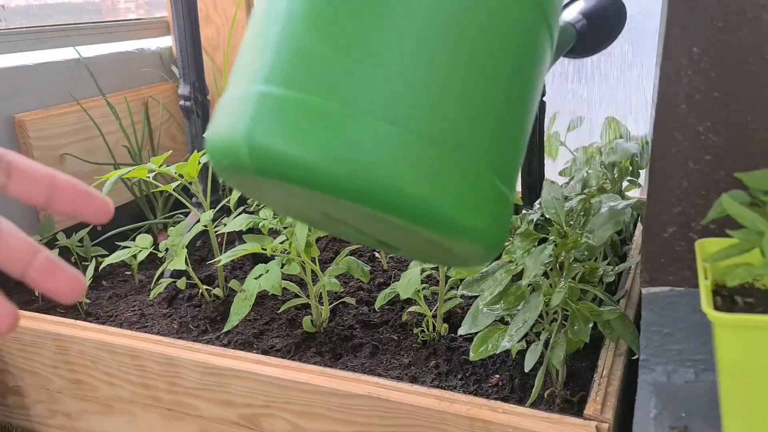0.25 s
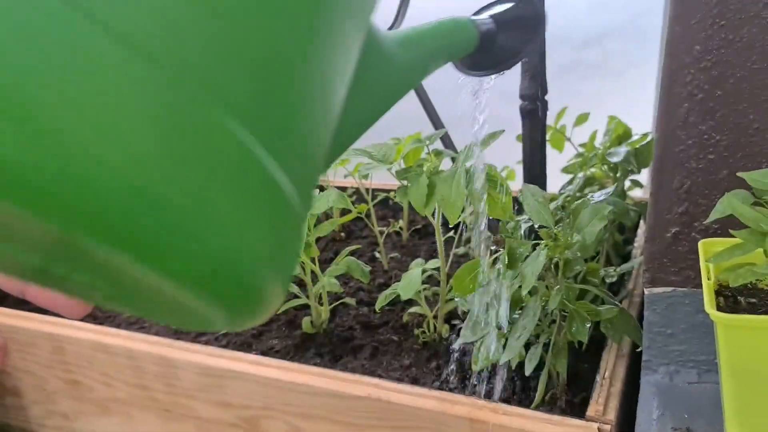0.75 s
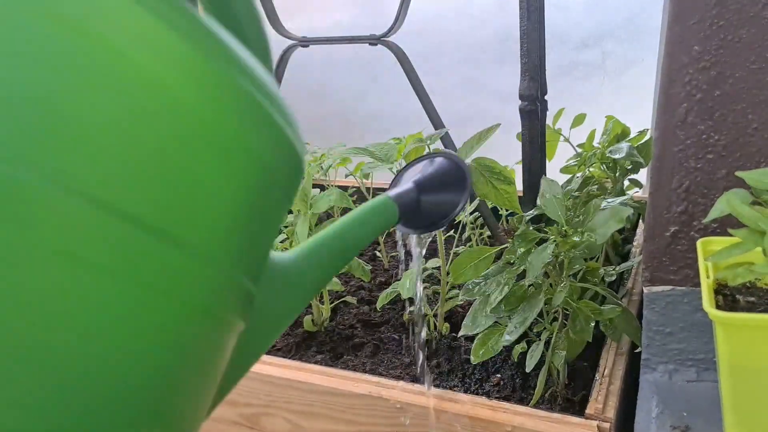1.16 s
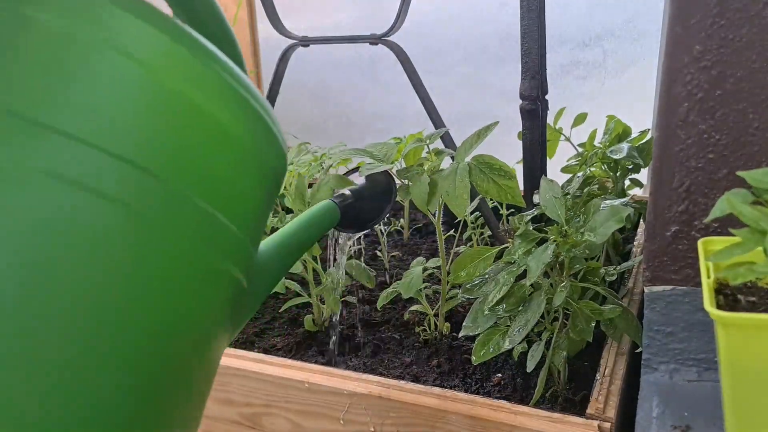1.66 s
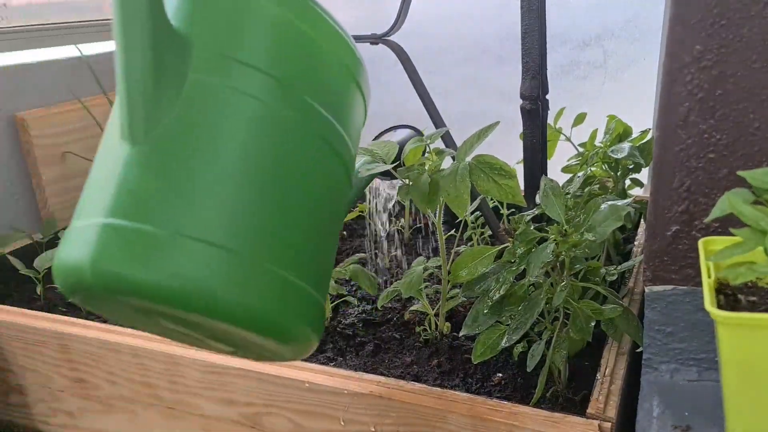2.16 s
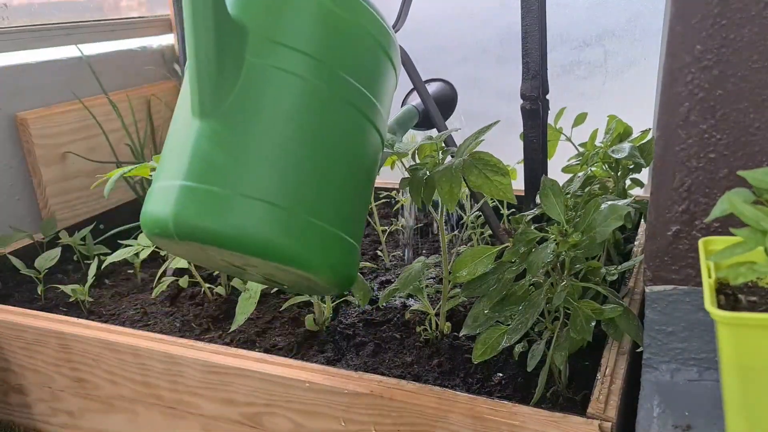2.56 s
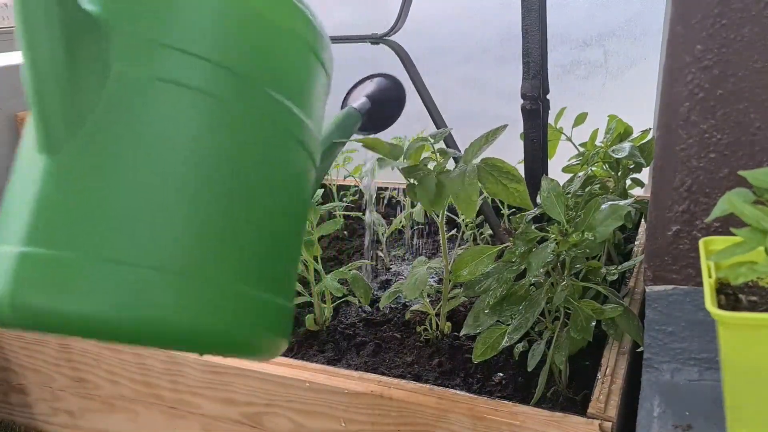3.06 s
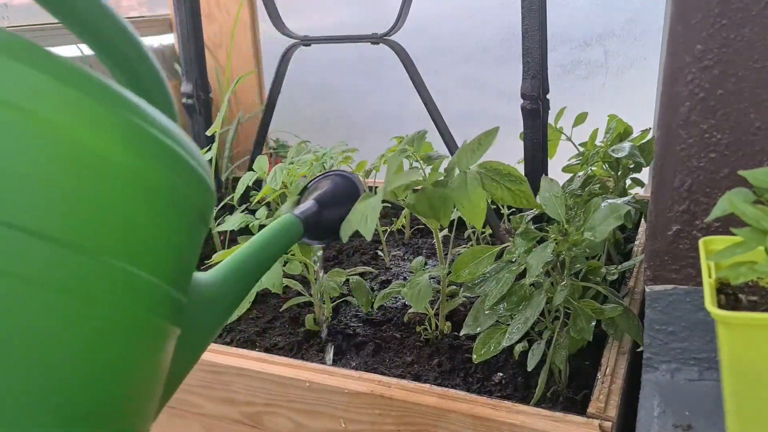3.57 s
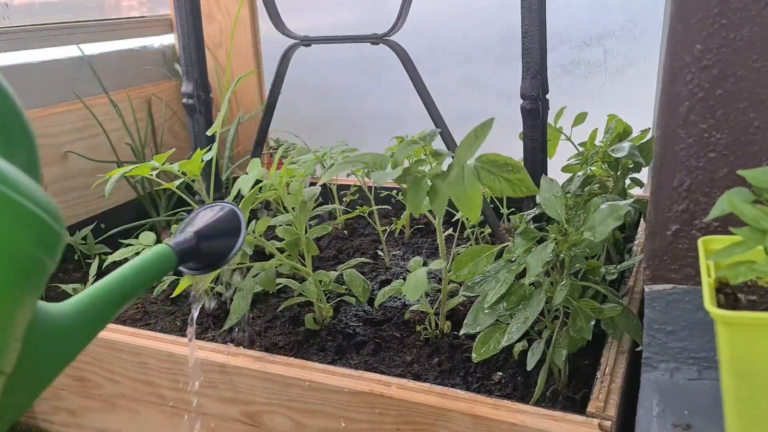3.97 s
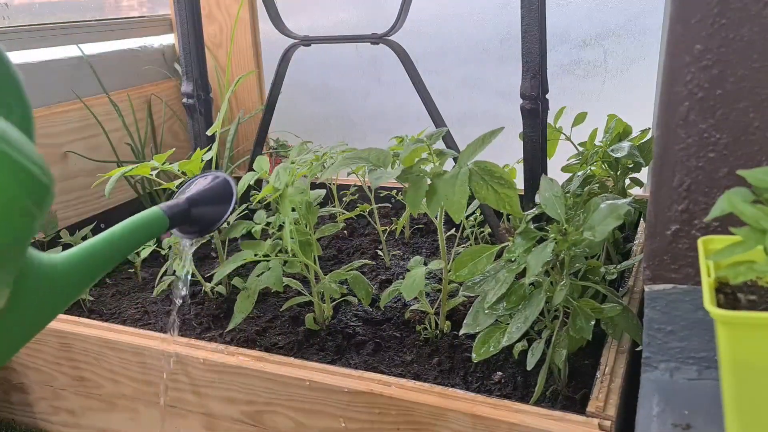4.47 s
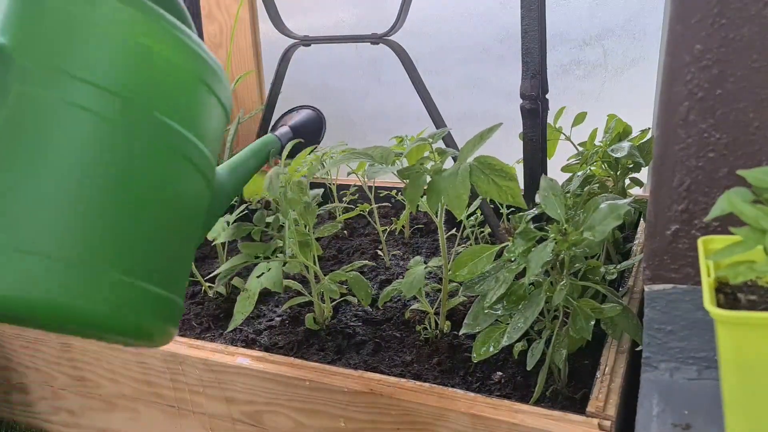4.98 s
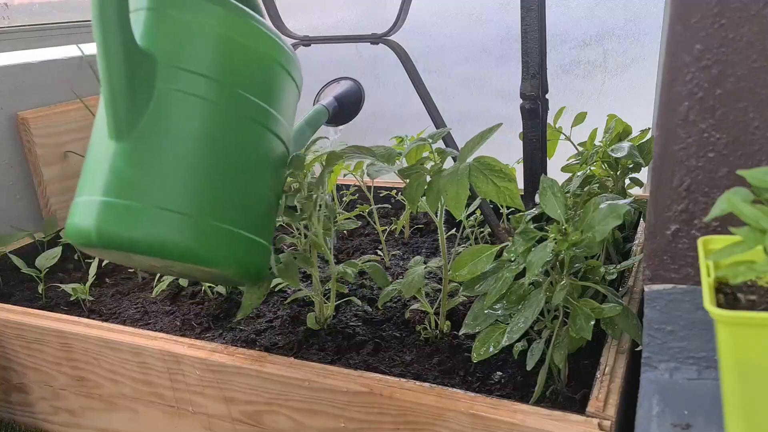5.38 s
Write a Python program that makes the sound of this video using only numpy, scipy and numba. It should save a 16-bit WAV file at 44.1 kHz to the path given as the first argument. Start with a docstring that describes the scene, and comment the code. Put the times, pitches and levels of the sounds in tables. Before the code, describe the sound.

A balcony planter is watered for about five and a half seconds, heard by two spaced microphones. A broad, bass-heavy city rumble swells gently throughout, with faint hiss and thin, dry ticks of uneven loudness about sixteen times a second. Water is a light, high, crisp patter on leaves with duller splatter on soil, not a heavy stream. Scattered drops begin around 0.4, cluster near 0.85-1.2, then thin out, with a clear plop at 1.8. From 2.7 to 3.2 drops and small bubbly plops thicken. A low engine drone swells from 2.4 to 3.6, strongest near 3. At 3.03 the plastic can bumps the planter in a short hollow clatter of about a tenth of a second. Two light taps come at 3.6, a faint soft swish at 3.8. After a lull, the sharpest, busiest spatter and plops come at 4.2-4.65, followed by sparse drops, with the spray rising slightly at the end.

```python
"""Water dribbles from a plastic watering can onto leaves and soil in a wooden planter on a balcony.
The drops are short puffs of filtered noise over a fine spray, and plops add a bubble tone.
The can bumps the planter once (short pushes ring it), then come two light taps and a soft broad swish.
An engine drone, a wavering sine, passes in the city rumble, which is shaped noise.
A thin dry tick of single samples recurs about sixteen times a second. Two spaced microphones."""
import sys
import numpy as np
from scipy import signal
from scipy.fft import rfft, irfft, next_fast_len
from scipy.io import wavfile
from scipy.ndimage import uniform_filter1d
from numba import njit

SR = 44100
rng = np.random.default_rng(int(sys.argv[2]) if len(sys.argv) > 2 else 0)


def file_out(sig):
    """Save sig as 16-bit WAV at sys.argv[1]."""
    # one column per channel
    cols = np.atleast_2d(sig).T
    # limit, then scale
    lim = np.clip(cols, -1, 1)
    pcm = np.round(lim * 32767).astype(np.int16)
    wavfile.write(sys.argv[1], SR, pcm)


N = 248283
TIME = np.arange(N) / SR  # seconds

# city noise by pitch; only the shape counts: (frequency [Hz], relative level per Hz [dB])
CITY_SPECTRUM = [(15, -74), (25, -30), (38, -4.5), (54, 1), (94, 0.5), (125, -10), (192, -8), (237, -16),
                 (276, -16.5), (572, -22), (999, -22), (1210, -26.5), (1900, -26), (2460, -46), (4200, -66),
                 (5460, -103), (9240, -120)]
# broad and narrow humps and dips in the city noise: (frequency [Hz], width [Hz], gain [dB])
CITY_HUMPS = [(59, 20, 1.5), (87, 8.5, 1), (192.8, 17, 5.5), (285, 14.7, 2.5), (330.6, 9.3, 4),
              (436, 78, 1.5), (863, 19, 4), (1830, 220, -3), (2990, 550, 8)]
# rise and fall of the traffic, each about its own mean: (time [s], rumble [dB], boom [dB], tyre roar [dB])
TRAFFIC_SWELL = [(0.0, -37, -32.5, -43.5), (0.25, -34, -39, -43), (0.61, -32.5, -42, -44.5),
                 (1.0, -39.5, -33, -42.5), (1.32, -33.5, -40, -44), (1.86, -36, -40, -43),
                 (2.12, -37.5, -45.5, -43.5), (2.6, -36, -41, -44), (3.26, -35.5, -43.5, -44.5),
                 (4.17, -34.5, -42, -44), (4.55, -38, -40.5, -43.5), (5.36, -33.5, -44, -44),
                 (5.63, -34.5, -41, -45.5)]
# balance of the city between the microphones: (frequency [Hz], left minus right [dB])
CITY_TILT = [(60, 0), (110, -0.5), (200, -1.5), (380, -4), (700, -2.5), (1290, -1.5), (2380, 1.5),
             (4400, -2), (8120, -1.5), (15000, -1.5)]
# how far the city differs at the two microphones: (frequency [Hz], side minus mid [dB])
CITY_WIDTH = [(60, -35), (110, -22), (200, -25), (380, -7), (700, -1), (1290, 1.5), (2380, 1), (4400, -0.5),
              (8120, 0), (15000, 0)]
# spray as the can swings to and fro:
# (time [s], relative level on the leaves [dB], relative level of the duller splatter on wet soil [dB])
POUR_LEVELS = [(0.0, -63, -66), (0.17, -67.5, -67), (0.47, -59, -73), (0.78, -67, -66), (0.89, -65, -72),
               (1.03, -53, -55.5), (1.18, -58, -69), (1.3, -74, -66), (1.39, -68, -73), (1.61, -68, -69),
               (1.77, -71, -69), (1.93, -61, -68), (2.18, -71, -70), (2.34, -61, -66), (2.43, -64, -64),
               (2.62, -51, -67.5), (2.74, -55, -65), (2.92, -49, -55.5), (2.96, -51, -59),
               (3.06, -45, -50.5), (3.18, -54, -61), (3.32, -64.5, -67), (3.43, -55, -57),
               (3.61, -79, -70.5), (3.86, -88, -78), (4.01, -54, -67.5), (4.22, -49, -70), (4.33, -65, -63),
               (4.42, -55, -63), (4.47, -47, -59), (4.52, -42, -54), (4.63, -67, -60.5), (4.69, -72, -69),
               (4.81, -72, -79), (5.05, -63, -68), (5.24, -59, -67.5), (5.63, -47, -70)]
# ticks with a set level, mostly loud, a few faint: (number of the tick [count from 0], level [dB])
SET_TICKS = [(0, -23), (1, -23), (2, -25), (5, -30), (6, -30), (9, -23), (10, -25), (13, -23), (15, -22),
             (16, -23), (17, -27), (18, -27), (20, -38), (21, -28), (23, -21), (24, -29), (25, -28),
             (26, -27), (27, -31), (28, -31), (29, -27), (30, -21), (31, -28), (34, -29), (33, -23),
             (35, -25), (38, -28), (40, -26), (42, -26), (46, -27), (47, -21), (49, -24), (50, -17),
             (51, -17), (54, -24), (56, -36), (60, -35), (62, -44), (58, -28), (59, -25), (61, -26),
             (65, -23), (74, -31), (76, -40), (75, -29), (79, -25), (80, -24), (81, -26), (82, -20),
             (85, -27), (87, -23)]
# the loudest single drops: (time [s], relative level [dB], centre [Hz], length [ms], left minus right [dB])
LOUD_DROPS = [(0.352, -54, 12300, 14, 0), (0.371, -46, 9900, 19, -3), (0.386, -48.5, 8450, 39, -2),
              (0.447, -51, 11500, 5, 0), (0.4807, -40, 13000, 2.3, 0), (0.5155, -51, 6600, 2.3, -2),
              (0.5794, -44, 11500, 1.3, -2), (0.6712, -51, 12300, 2.0, -1), (0.694, -45, 11800, 3, -9),
              (0.885, -61, 14000, 5, -2), (0.7001, -46, 11400, 1.2, -2), (0.838, -44, 12800, 2.8, -1),
              (0.852, -40, 11500, 2.2, -5), (0.857, -32.5, 11800, 1.5, -1), (0.91, -59, 11000, 2, -2),
              (0.943, -36, 12600, 2.8, 4), (0.955, -43, 11900, 6.3, -5), (0.972, -46, 11600, 6, 1),
              (0.9915, -26, 12100, 1.1, -2), (1.024, -36.5, 11300, 2.8, 0), (1.05, -36, 11600, 2.4, 1),
              (1.076, -44, 10600, 3.1, -1), (1.1367, -45, 11400, 3.5, -4), (1.1495, -43, 12500, 1.5, -2),
              (1.177, -46, 11400, 9.4, -1), (1.2046, -44, 11500, 1.5, -3), (1.298, -44, 11300, 3.3, -2),
              (1.3125, -37, 11200, 2.7, -3), (1.3347, -39.5, 11700, 2.6, -4), (1.3579, -50, 10200, 1.7, -2),
              (1.6, -49, 10600, 4.0, -2), (1.6175, -51, 10500, 4.3, -3), (1.688, -45, 10300, 4.8, -2),
              (1.83, -40.5, 8200, 1.5, -1), (1.906, -37.5, 6500, 0.74, 1), (2.042, -61, 14000, 4, -6),
              (2.16, -55, 10000, 11, -6), (2.207, -55, 10000, 6, -2), (2.272, -51, 9600, 8.6, -3),
              (2.282, -45, 11500, 3, -1), (2.3308, -49, 10800, 7, -1), (2.368, -48, 10500, 4, -5),
              (2.4314, -47, 10000, 1.1, -6), (2.4933, -44, 10200, 4.1, -1), (2.522, -54, 11300, 1.6, -3),
              (2.6182, -48, 9500, 2, -8), (2.6746, -43, 11200, 1.5, 0), (2.7376, -35, 11770, 2.7, -2),
              (2.76, -42, 10000, 4, -1), (2.7863, -41, 6600, 6.3, -1), (2.807, -37, 9500, 4, -2),
              (2.8204, -33.5, 11300, 4.2, -1), (2.864, -33.5, 10900, 1.8, -3), (2.87, -46, 12500, 1.5, -2),
              (2.878, -37, 11000, 2, -2), (2.892, -51, 13500, 2, -2), (2.904, -47, 11800, 1.8, -2),
              (2.912, -49, 11800, 3, 2), (2.9821, -52, 12500, 4.0, 1), (2.998, -46, 11000, 2, -2),
              (3.012, -39.5, 10600, 2.8, -7), (3.094, -54, 9300, 15, 1), (3.1475, -49, 9050, 6.5, 0),
              (3.1756, -37.5, 9940, 4.7, 0), (3.2358, -44, 10200, 7.1, -5), (3.352, -38, 8800, 3.1, -1),
              (3.3747, -40, 10400, 1.6, -5), (3.4197, -42, 9900, 4.3, -2), (3.4522, -46, 10800, 9.3, 0),
              (3.4792, -44, 9900, 12, -4), (3.5, -32, 10930, 8.7, -1), (3.636, -57, 7000, 6.5, -1),
              (4.0418, -50, 12200, 4.2, 0), (4.0898, -42.5, 11200, 3.2, 1), (4.101, -43, 11800, 2, -3),
              (4.115, -43, 11500, 2.8, 2), (4.181, -46.5, 12800, 1.5, -3), (4.1929, -39, 11800, 1.4, 0),
              (4.217, -35.5, 9700, 2.8, 0), (4.249, -38, 10800, 6.4, 0), (4.2763, -65, 10500, 2.9, -4),
              (4.309, -32.5, 11100, 2.6, 0), (4.329, -37.5, 10900, 3.7, -3), (4.354, -41, 11000, 1.3, 0),
              (4.357, -28, 10500, 1.8, 1), (4.3854, -34, 11900, 3.4, -2), (4.3956, -41, 12200, 3.0, 0),
              (4.413, -25, 8850, 2.3, -1), (4.4233, -36, 8900, 2.0, 0), (4.442, -36, 9500, 1.9, -2),
              (4.457, -37, 8000, 1.5, 0), (4.474, -37, 9500, 2.5, 2), (4.504, -21.5, 9400, 1.4, -2),
              (4.5195, -36, 10500, 1.2, 1), (4.52, -31, 10300, 1.6, -3), (4.537, -54, 10500, 2, 0),
              (4.556, -38, 10000, 3.4, -2), (4.562, -36, 10100, 4.3, -2), (4.577, -36, 9500, 2.4, 0),
              (4.587, -45, 9600, 2.0, -2), (4.596, -39, 9300, 7.5, 0), (4.633, -48, 11200, 3.2, -6),
              (4.6457, -38, 9000, 4.5, -1), (5.045, -46.0, 11000, 2.6, 0), (5.229, -43.5, 10700, 3.8, -4),
              (5.26, -43, 8640, 8, -1), (5.33, -44, 7700, 3.3, -1), (5.385, -45.5, 10500, 3.1, -3),
              (5.4686, -44, 9800, 5.4, -1), (5.518, -45, 10200, 3, -3), (5.573, -44.5, 10700, 6.5, -1)]
# plops into pooled water: (time [s], relative level [dB], pitch [Hz], time to fall 60 dB [ms])
WATER_PLOPS = [(0.383, -47, 4500, 93), (0.4194, -50.5, 3470, 100), (0.514, -52, 3860, 57),
               (0.762, -52, 4800, 44), (1.025, -46.5, 4480, 30), (1.051, -47, 4500, 25),
               (1.07, -51, 5500, 25), (1.077, -52, 6000, 25), (1.175, -43, 5600, 37),
               (1.191, -44, 3940, 28), (1.203, -45.5, 5800, 25), (1.214, -46, 5300, 30),
               (1.312, -46, 5500, 20), (1.358, -48, 6200, 18), (1.7814, -53, 4800, 50),
               (1.835, -37, 5260, 89), (2.12, -49, 5500, 50), (2.2707, -49.5, 3370, 78),
               (2.281, -52, 4640, 80), (2.33, -51, 4700, 110), (2.341, -52, 8840, 40),
               (2.4059, -51, 6040, 40), (2.433, -52, 4550, 62), (2.741, -44.5, 4050, 76),
               (2.764, -44, 4370, 65), (2.785, -37.5, 4450, 78), (2.8186, -41, 4440, 70),
               (2.831, -41, 4080, 150), (2.85, -40, 2770, 50), (2.858, -36, 4070, 68),
               (2.877, -58, 4300, 40), (2.9038, -45, 5900, 54), (2.915, -44, 2900, 95),
               (2.9453, -43, 6200, 30), (2.978, -48, 2720, 67), (3.093, -44, 6000, 46),
               (3.371, -50, 3060, 64), (3.4184, -52, 3800, 50), (3.474, -40.5, 4280, 91),
               (3.524, -48, 4200, 50), (4.2143, -38, 5900, 30), (4.3075, -48, 2500, 25),
               (4.3559, -33.5, 2670, 40), (4.356, -34, 6000, 25), (4.394, -42, 6300, 25),
               (4.4096, -36, 6000, 22), (4.421, -35, 2220, 25), (4.4412, -34.5, 2300, 25),
               (4.4723, -41, 5700, 25), (4.503, -33.5, 2340, 35), (4.5035, -43, 6600, 25),
               (4.519, -34, 6100, 32), (4.5848, -41.5, 2680, 27), (4.586, -47, 5500, 17),
               (4.6447, -49, 4030, 18), (5.261, -48, 5230, 46), (5.47, -46, 4800, 43),
               (5.591, -48, 6000, 75)]
# engine drone passing below: (time [s], pitch [Hz], level before fades and wavering [dB])
ENGINE_DRONE = [(2.42, 89.3, -40), (2.6, 86, -25.5), (2.85, 79, -26.5), (2.97, 80.3, -19.5),
                (3.08, 82.2, -26), (3.19, 80.7, -20.5), (3.32, 83, -27), (3.46, 86.4, -33),
                (3.6, 86.5, -31)]
# the can bumps and chatters on the planter:
# (time [s], push [dB], contact time [ms], relative noise level [dB])
CAN_BUMPS = [(3.0325, -21, 0.2, -30.5), (3.0347, -15, 0.68, -38), (3.038, -18, 0.59, -36),
             (3.0491, -11, 1.5, -32.5), (3.0553, -18.5, 0.39, -49), (3.0605, -13.5, 1.15, -38),
             (3.07, -17.5, 1.16, -52), (3.076, -21, 1.7, -59), (3.085, -18, 1.4, -57),
             (3.1, -28, 0.95, -61), (3.1078, -20.5, 1.94, -61), (3.114, -30, 2, -58)]
# ringing of the hollow can and planter boards:
# (frequency [Hz], level [dB], time to fall 60 dB [s], left minus right [dB], left phase lead [rad])
BODY_MODES = [(168, -18, 0.041, -6, 4), (268, -2.5, 0.1, -3.5, 0.4), (347, -4.5, 0.043, -8, 1.6),
              (407, -1, 0.062, -8.5, -2), (500, 4, 0.021, -3.5, 2), (718, -9, 0.086, 0, 4),
              (880, -9, 0.044, -7, -2), (1020, -22, 0.038, -1, 1), (1190, -3.5, 0.03, 1.5, 0.4),
              (1660, -16, 0.025, 3, -3), (2140, -4.5, 0.03, 10, 4.5), (2560, -5, 0.027, 15, 3.5),
              (3270, -6, 0.04, -1, 5)]
# something light taps twice nearby: (time [s], relative level [dB])
LIGHT_TAPS = [(3.582, -30), (3.597, -41)]
# ringing of the tapped thing:
# (frequency [Hz], level [dB], time to fall 60 dB [s], left minus right [dB], left phase lead [rad])
TAP_MODES = [(820, 3, .12, 1.1, 2.5), (1633, -2, 0.057, 3, 1.2), (1772, -2, 0.089, 3, 1.9),
             (2080, -2, 0.057, 3, 3.1), (2330, -5, 0.036, 2.6, 1.7), (2590, -11, .03, 2.6, 1.5)]
# a soft broad swish, perhaps a passing tyre:
# (time [s], level [dB], centre [Hz], width [Hz], rise [ms], fall rate as time for 60 dB [s])
SOFT_SWISH = (3.78, -56, 3300, 2400, 70, .45)
# treble colour of the microphones: (frequency [Hz], gain [dB])
MIC_COLOUR = [(3000, -0.5), (6500, -1.5), (7700, -3.5), (9000, -3), (12000, 0.5), (15500, -2)]

CITY_DB, HISS_DB, TOP_HZ = -26.5, -74.5, 15550
# the ticks keep to a grid: they come every three or four steps, evenly on average
TICK_START_S, GRID_S, STEPS_PER_TICK, STEP_OFFSET = 0.0341, 0.0166835, 3.784, 0.288
# ticks without a set level: loudest possible, mean depth below that; all ticks: spread left to right
FAINT_TICK_DB, FAINT_SPREAD_DB, TICK_SCATTER_DB = -31, 6, 3
SPLAT_WIDTH_HZ, WIDTH_PER_HZ = 25000, -0.35  # width at 10 kHz; duller splats are broader
SPLAT_FLOOR_HZ = 4300  # thin leaves give little below this
RISE_SHARE, T60_PER_LENGTH = 0.7, 4.0  # both as multiples of the drop's length
CORE_DB, CORE_WIDTH_HZ = -4.5, 5200  # a narrower band of noise inside the broad splat
# tail level for a drop of -47 dB; the tail grows more slowly than the splat
TAIL_DB, TAIL_DB_PER_DB, TAIL_RISE_MS = -53.5, 0.7724, 2.5
WATER_SCATTER_DB = 1.5  # spread of the plops left to right
PLOP_TONE_DB, PLOP_GLIDE_PER_S = -7, 4.0  # the bubble in the splash, rising as it nears the surface


def undb(db):
    """Turn decibels into a plain factor."""
    return 10 ** (np.asarray(db) / 20)


def unit(x):
    """Scale a sound to an average (RMS) level of one."""
    return x / np.sqrt(np.mean(x ** 2))


def on_hz(table, hz):
    """Read a (frequency, value) table on a log-frequency axis."""
    table_hz, values = np.transpose(table)
    return np.interp(np.log(hz), np.log(table_hz), values)


def pan(x, pan_db):
    """Make the left louder than the right by pan_db, half on each side."""
    return x * undb(np.array([[pan_db], [-pan_db]]) / 2)


def add(out, s, x):
    """Mix x into out from time s in seconds."""
    start = int(s * SR)
    x = x[..., :N - start]
    out[..., start:start + x.shape[-1]] += x


def fall(t, t60):
    """A dying-away curve that drops 60 dB in the time t60."""
    return np.exp(-np.log(1000) * t / t60)


def spectrum_hz(size):
    """The frequencies of a Fourier transform, kept at 1 Hz or more."""
    return np.maximum(np.arange(size // 2 + 1) * SR / size, 1)


def walk(rate):
    """Random levels held for 1 / rate seconds, then smoothed twice; their spread is near 1."""
    hold = int(SR / rate)
    steps = np.repeat(rng.standard_normal(N // hold + 1), hold)
    smooth = uniform_filter1d(uniform_filter1d(steps, hold), hold)
    return 1.74 * smooth[:N]


def scatter(count, spread_db):
    """A random left-minus-right level for each event."""
    return spread_db * rng.standard_normal(count)


@njit
def svf(x, hz, width):
    """A band-pass filter (state-variable) whose centre can move, with gain 1 there."""
    y, band, low = np.empty(len(x)), 0., 0.
    for i in range(len(x)):
        g, k = np.tan(np.pi * hz[i] / SR), width / hz[i]
        v = (band + g * (x[i] - low)) / (1 + g * (g + k))
        band, low, y[i] = 2 * v - band, low + 2 * g * v, k * v
    return y


def burst(hz0, hz1, width_hz, t60, attack_ms):
    """A puff of noise, unrelated at the two microphones, in a band gliding hz0 to hz1; at most 0.19 s."""
    noise = rng.standard_normal((2, 8192))
    t = np.arange(noise.shape[1]) / SR
    hz = np.clip(hz1 + (hz0 - hz1) * np.exp(-t / 0.0023), 200, 0.42 * SR)
    width = 1.0 * width_hz
    band = np.array([svf(svf(n, hz, width), hz, width) for n in noise])
    rise = np.sin(np.pi / 2 * np.minimum(t / attack_ms * 1000, 1)) ** 2
    return unit(band) * rise * fall(np.maximum(t - attack_ms / 1000, 0), max(t60, 0.003))


def droplets(per_s, spread_db, tail_ms):
    """Power of droplets of very uneven size landing at random moments, each with a short tail."""
    sizes = undb(2 * spread_db * np.minimum(rng.exponential(size=N), 3.5))
    hits = (rng.random(N) < per_s / SR) * sizes
    power = signal.lfilter([1], [1, -np.exp(-1000 / (tail_ms * SR))], hits)
    power = uniform_filter1d(power, size=80)  # a drop takes about two milliseconds to spread
    return power / power.mean()


def ring(modes):
    """One blow makes each mode of a table sound as a dying sine at the two microphones."""
    t, side = np.arange(SR // 2) / SR, np.array([[0.5], [-0.5]])
    total = 0
    for hz, db, t60, pan_db, lead in modes:
        tone = np.sin(2 * np.pi * hz * t + side * lead)
        total = total + pan(undb(db) * tone * fall(t, t60), pan_db)
    return total


def city():
    """Diffuse traffic noise, alike at both microphones in the bass; rumble, boom and roar swell on their own."""
    size = next_fast_len(N)
    hz = spectrum_hz(size)
    db = on_hz(CITY_SPECTRUM, hz)
    for hump_hz, width_hz, gain_db in CITY_HUMPS:
        db = db + gain_db * np.exp(-((hz - hump_hz) / width_hz) ** 2)
    mid, side = rfft(rng.standard_normal((2, size)))
    width = undb(on_hz(CITY_WIDTH, hz))
    ears = mid + width * side * np.array([[1], [-1]])
    ears = ears * undb(db) / np.sqrt(1 + width ** 2)
    ears = ears * undb(np.array([[0.5], [-0.5]]) * on_hz(CITY_TILT, hz))
    s, *swells_db = np.transpose(TRAFFIC_SWELL)
    parts = np.zeros((3, 2, N))  # rumble, boom, roar
    # overlapping bands half an octave apart, each with its own slow wavering
    for octave in np.arange(4, 13, 0.5):
        share = np.cos(np.pi * np.clip(np.log2(hz) - octave, -0.5, 0.5)) ** 2
        part = int(octave > 7.2) + int(octave > 7.7)
        parts[part] += irfft(ears * share, size)[:, :N] * undb(1.04 * walk(6))
    gains = [undb(np.interp(TIME, s, swell) - np.mean(swell)) for swell in swells_db]
    return unit(sum(part * gain for part, gain in zip(parts, gains))) * undb(CITY_DB)


def spray():
    """Patter band by band: broad splats sound in all bands at once, small droplets in one band only."""
    s, leaves_db, soil_db = np.transpose(POUR_LEVELS)
    out, broad, rush_db = 0, droplets(300., 3.6, 3.0), 1.5 * walk(30)
    for hz in np.geomspace(3300, 15000, 9):
        # soil below 6 kHz, leaves blending in above
        leafy = np.clip(np.log2(hz / 6000) / 1.8, 0, 1)
        pour_db = np.interp(TIME, s, leafy * leaves_db + (1 - leafy) * soil_db)
        db = pour_db + rush_db + 2.2 * walk(40)
        power = 0.87 * broad + 0.59 * droplets(110.0, 8.0, 6.1) + 0.13
        centre, width = np.full(N, hz), 0.38 * hz
        noise = rng.standard_normal((2, N))
        band = np.array([svf(svf(n, centre, width), centre, width) for n in noise])
        out = out + unit(band) * np.sqrt(power) * undb(db) / 2
    return pan(out, -0.97)


def ticks():
    """One-sample clicks on the grid; some have a set level, the others are faint and uneven."""
    out, number = np.zeros((2, N)), np.arange(int(N / SR / GRID_S / STEPS_PER_TICK))
    times = TICK_START_S + GRID_S * np.floor(number * STEPS_PER_TICK + STEP_OFFSET)
    levels_db = FAINT_TICK_DB - FAINT_SPREAD_DB * rng.exponential(size=len(number))
    for k, db in SET_TICKS:
        levels_db[k] = db
    for s, db, pan_db in zip(times, levels_db, scatter(len(number), TICK_SCATTER_DB)):
        add(out, s, undb(db) * pan(np.ones(1), pan_db))
    return out


def drops():
    """Each drop is a short splat of noise with a fainter tail that breaks up into scattered droplets."""
    out, tails = np.zeros((2, N)), np.zeros((2, N))
    for s, db, hz, head_ms, pan_db in LOUD_DROPS:
        width_hz = SPLAT_WIDTH_HZ + WIDTH_PER_HZ * (hz - 10000)
        rise_ms = RISE_SHARE * head_ms
        t60 = T60_PER_LENGTH * head_ms / 1000
        splat = 0.84 * burst(hz, hz, width_hz, t60, rise_ms)
        core = undb(CORE_DB) * burst(hz, hz, CORE_WIDTH_HZ, t60, rise_ms)
        tail = burst(hz, hz, 1.1 * width_hz, 0.11, TAIL_RISE_MS)
        # start early so that the rise ends at the listed time
        add(out, s - rise_ms / 1000, pan(splat + core, pan_db) * undb(db))
        add(tails, s, pan(tail, pan_db) * undb(TAIL_DB + TAIL_DB_PER_DB * (db + 47.0)))
    out += tails * np.sqrt(0.45 + 0.8 * droplets(260., 3.5, 1.5))
    floor = signal.butter(3, SPLAT_FLOOR_HZ, 'highpass', fs=SR, output='sos')
    return signal.sosfilt(floor, out)


def plops():
    """Drops into pooled water: a narrow band of splash noise round the rising tone of a bubble."""
    out, t = np.zeros((2, N)), np.arange(4096) / SR
    for (s, db, hz, t60_ms), pan_db in zip(WATER_PLOPS, scatter(len(WATER_PLOPS), WATER_SCATTER_DB)):
        phase = 2 * np.pi * (hz * (t + PLOP_GLIDE_PER_S * t ** 2 / 2) + rng.random((2, 1)))
        bubble = np.sqrt(2) * np.sin(phase) * np.minimum(t / 0.0011, 1) * fall(t, t60_ms / 1000)
        splash = burst(hz, hz, 0.31 * hz, t60_ms / 1000, 0.8)
        add(out, s, undb(db - 1.5) * pan(splash, pan_db))
        add(out, s, undb(db + PLOP_TONE_DB) * pan(bubble, pan_db))
    return out


def drone():
    """One wavering engine tone, a sine that swells and fades."""
    s, hz, db = np.transpose(ENGINE_DRONE)
    fade = np.clip(np.minimum(TIME - s[0], s[-1] - TIME) / 0.33, 0, 1)
    tone = np.sqrt(2) * np.sin(2 * np.pi * np.cumsum(np.interp(TIME, s, hz)) / SR)
    level = undb(np.interp(TIME, s, db) + 1.0 * walk(5.35))
    return pan(tone * fade * level, -0.72)


def bump():
    """Half-sine pushes ring the body (a longer contact excites only low modes), each with short puffs of noise."""
    push, puffs = np.zeros(N), np.zeros((2, N))
    for s, db, contact_ms, noise_db in CAN_BUMPS:
        contact = contact_ms * SR / 1000  # in samples
        shape = np.sin(np.pi * np.arange(0.5, contact) / contact)
        add(push, s, undb(db) * shape / shape.sum())
        # noise unrelated at the two microphones
        bright = burst(2050, 1500, 1900.0, 0.074, 0.94)
        dull = 2.17 * burst(1170, 620, 880.0, 0.17, 0.99)
        add(puffs, s, undb(noise_db) * (bright + dull))
    body = signal.fftconvolve(push[None], ring(BODY_MODES))[:, :N]
    return body + pan(puffs, 2.2)


def taps():
    """Two light, soft-edged taps ring something small, each with a scrape of noise."""
    out = np.zeros((2, N))
    rise = np.minimum(np.arange(SR // 2) / SR / 0.003, 1)
    for s, db in LIGHT_TAPS:
        add(out, s, undb(db) * (ring(TAP_MODES) * rise))
        add(out, s, undb(db - 9.0) * burst(2550, 1610, 530.0, 0.22, 2.9))
    return out


def swish():
    """A single broad puff of noise that rises softly, perhaps a passing tyre."""
    out = np.zeros((2, N))
    s, db, hz, width_hz, rise_ms, t60 = SOFT_SWISH
    add(out, s, undb(db) * burst(hz, hz, width_hz, t60, rise_ms))
    return out


def scene():
    """All the sounds together."""
    return city() + spray() + ticks() + drops() + plops() + drone() + bump() + taps() + swish()


def record(dry):
    """Microphone hiss and treble colour, then a steep cut of the top."""
    wet = dry + undb(HISS_DB) * rng.standard_normal(dry.shape)
    size = next_fast_len(N)
    colour = undb(on_hz(MIC_COLOUR, spectrum_hz(size)))
    wet = irfft(rfft(wet, size) * colour, size)[:, :N]
    return signal.sosfilt(signal.ellip(8, 0.2, 60, TOP_HZ, fs=SR, output="sos"), wet)


dry = scene()
out = record(dry)
file_out(out)
```